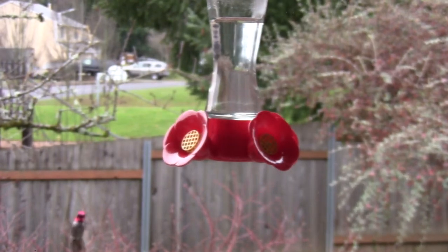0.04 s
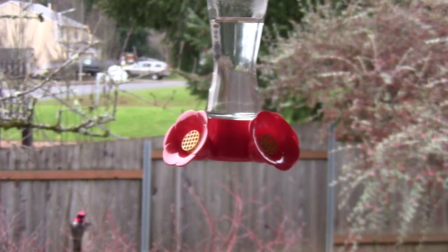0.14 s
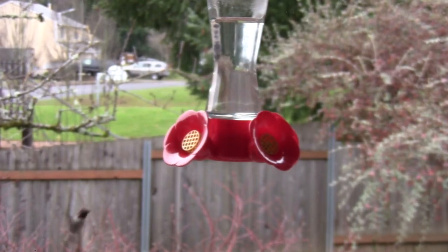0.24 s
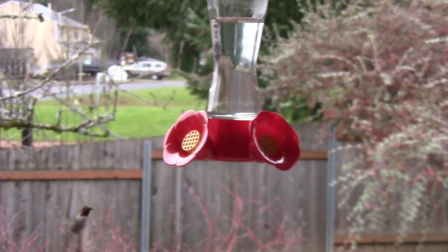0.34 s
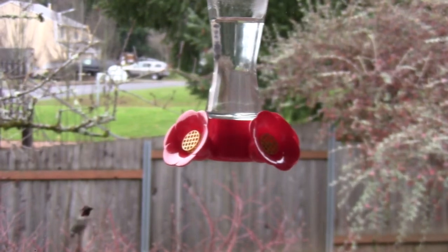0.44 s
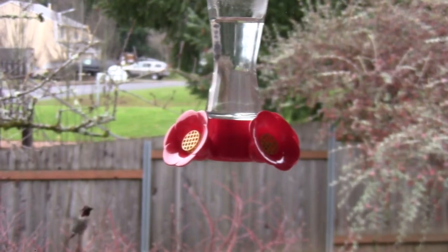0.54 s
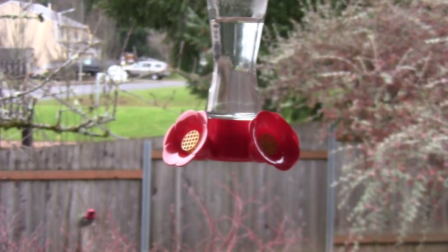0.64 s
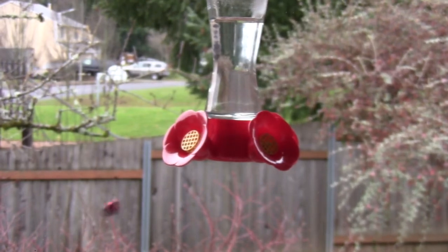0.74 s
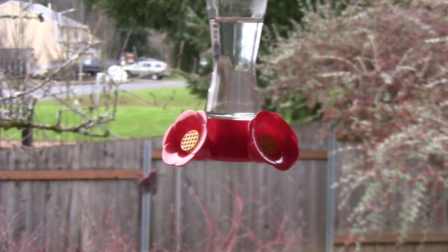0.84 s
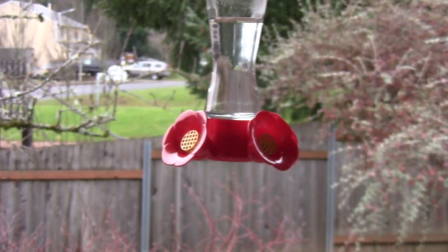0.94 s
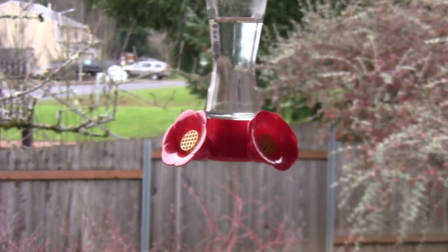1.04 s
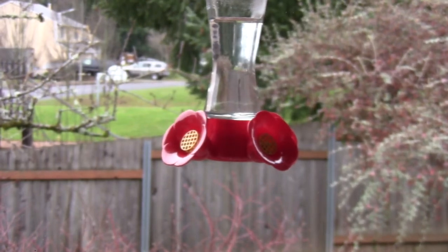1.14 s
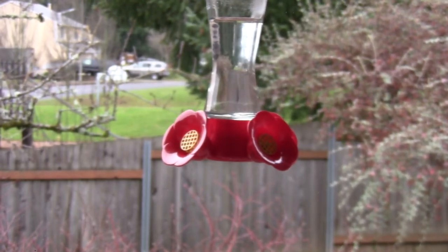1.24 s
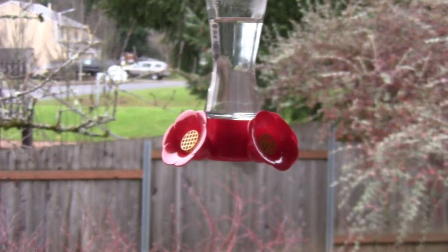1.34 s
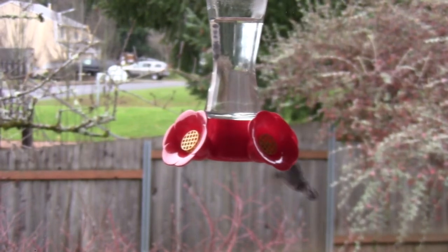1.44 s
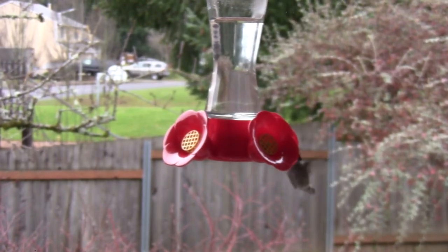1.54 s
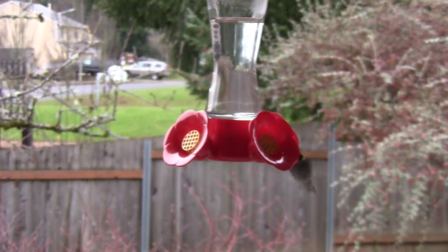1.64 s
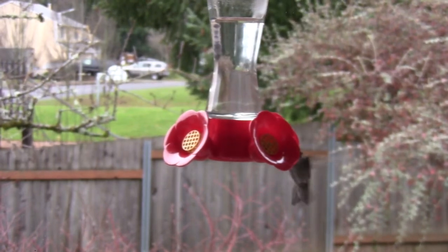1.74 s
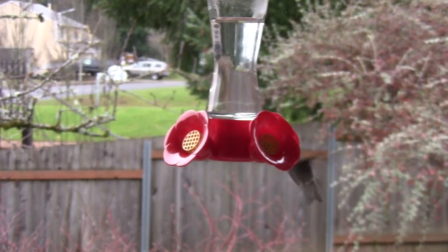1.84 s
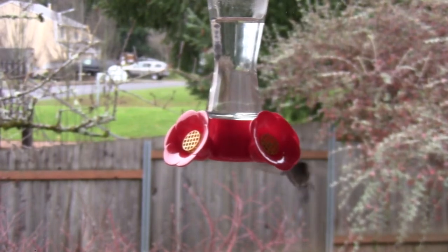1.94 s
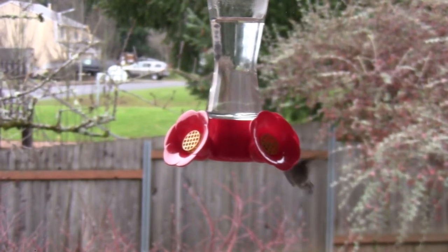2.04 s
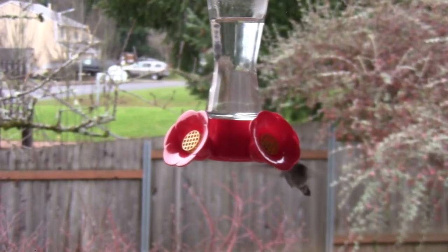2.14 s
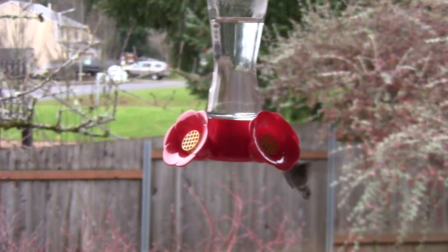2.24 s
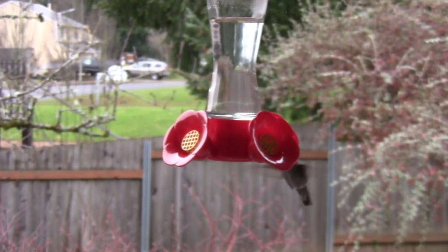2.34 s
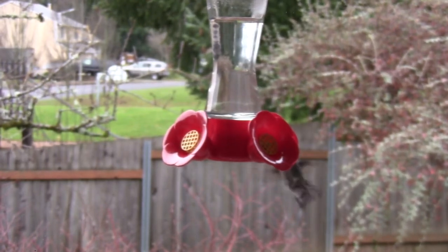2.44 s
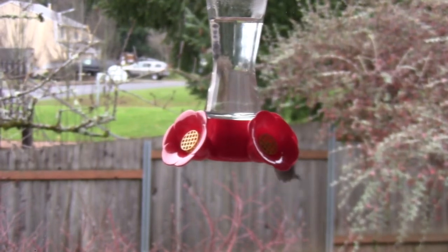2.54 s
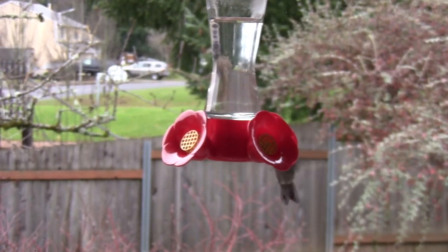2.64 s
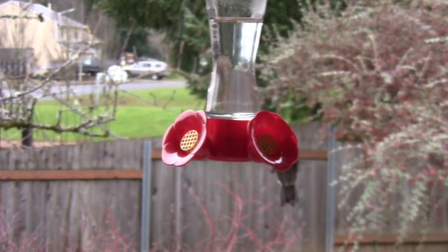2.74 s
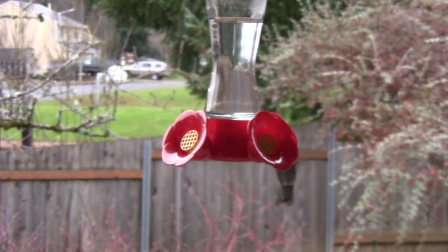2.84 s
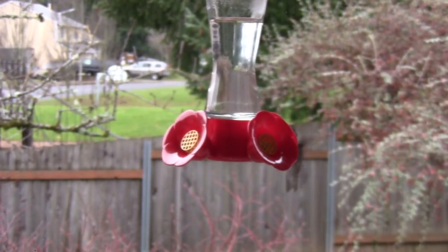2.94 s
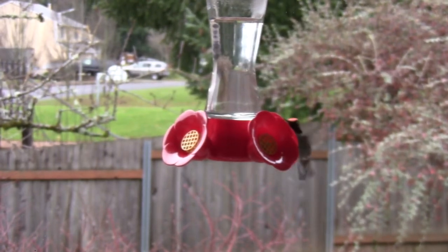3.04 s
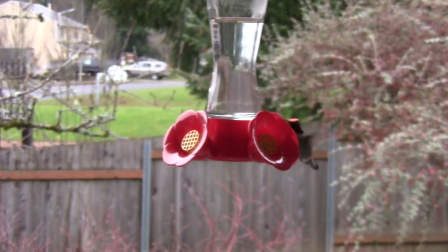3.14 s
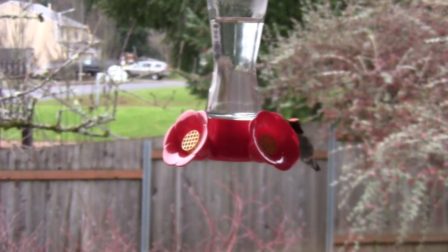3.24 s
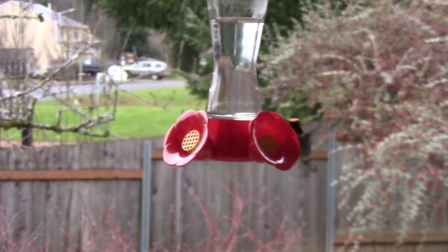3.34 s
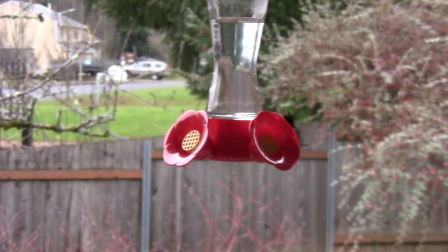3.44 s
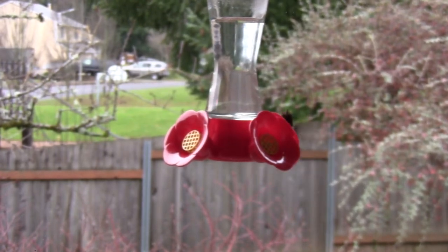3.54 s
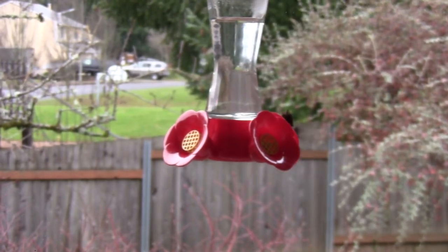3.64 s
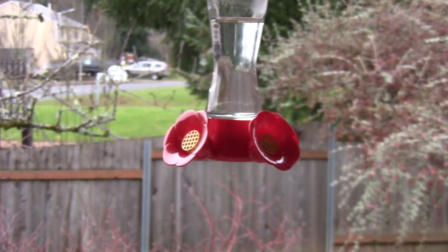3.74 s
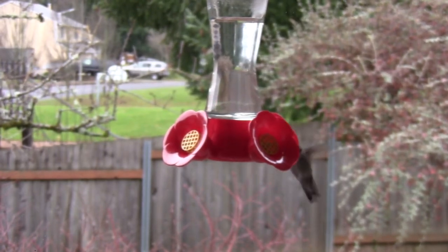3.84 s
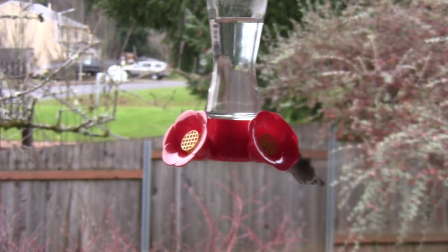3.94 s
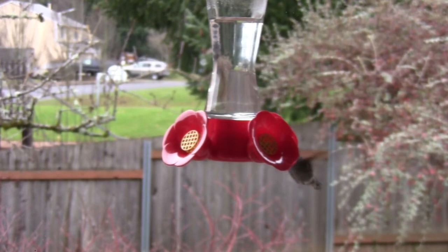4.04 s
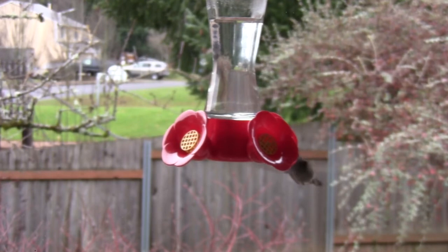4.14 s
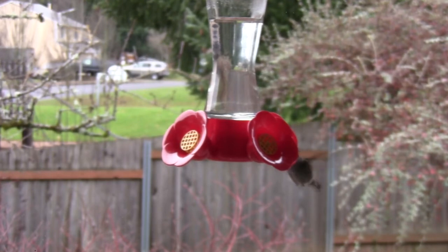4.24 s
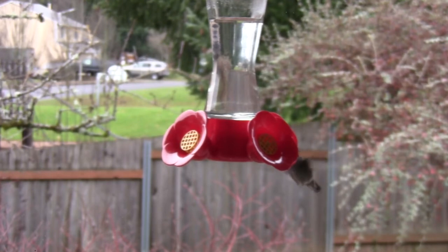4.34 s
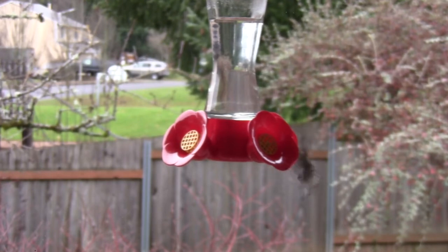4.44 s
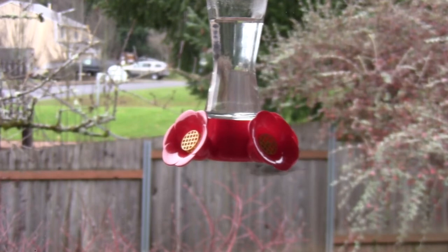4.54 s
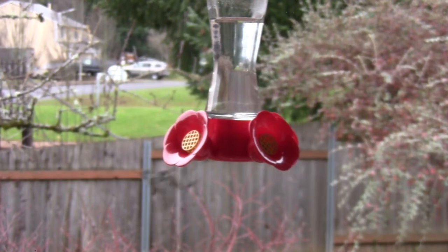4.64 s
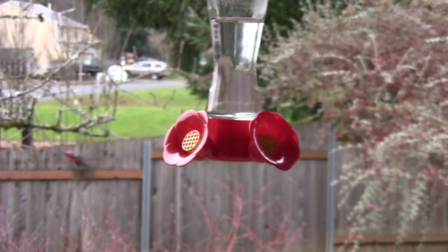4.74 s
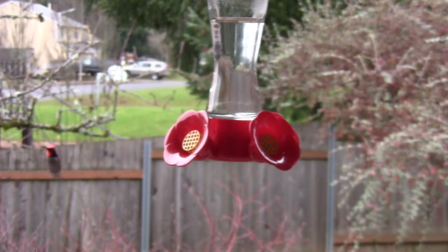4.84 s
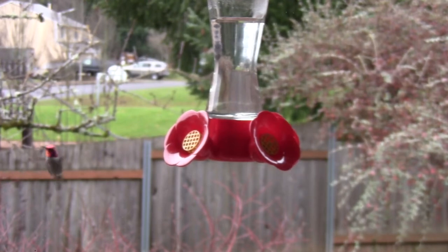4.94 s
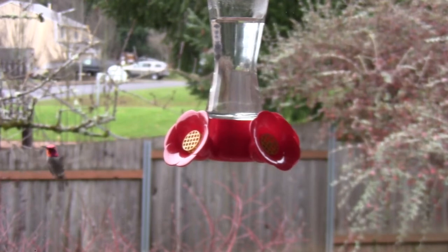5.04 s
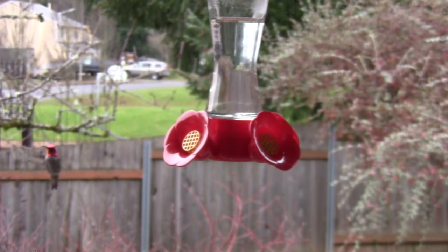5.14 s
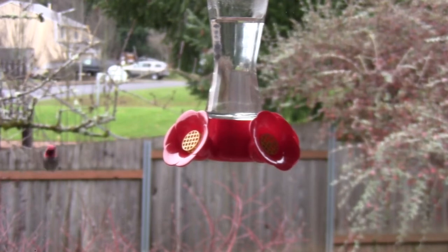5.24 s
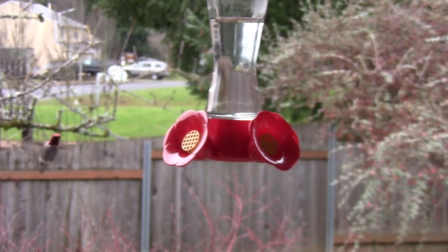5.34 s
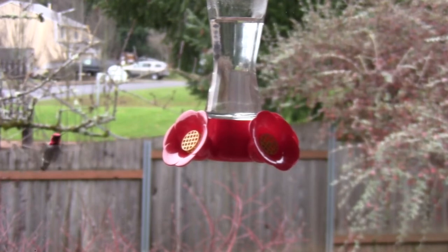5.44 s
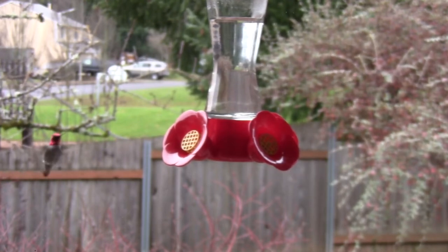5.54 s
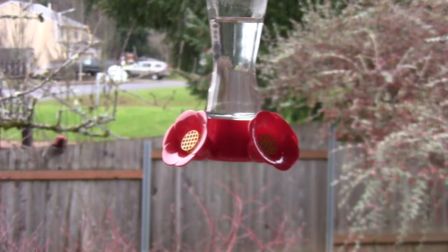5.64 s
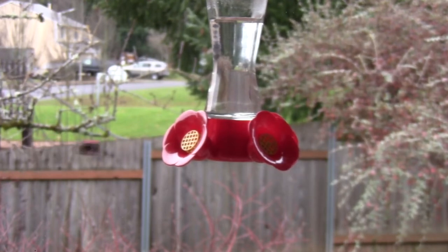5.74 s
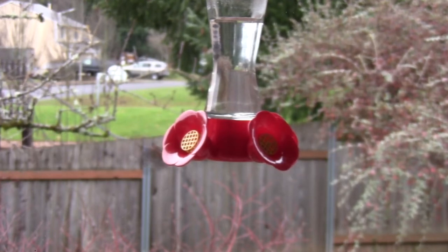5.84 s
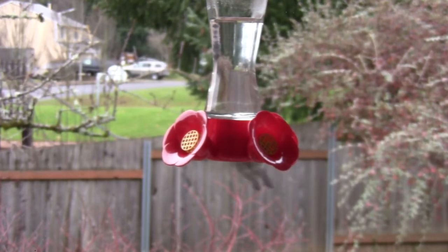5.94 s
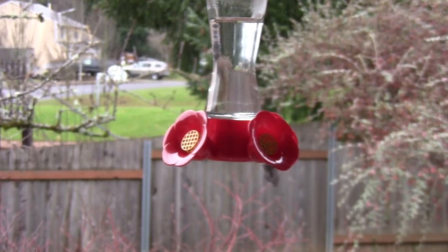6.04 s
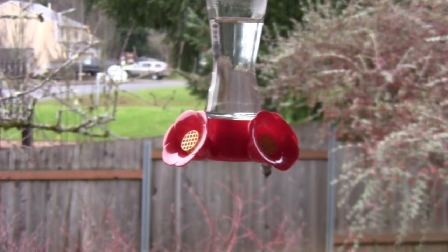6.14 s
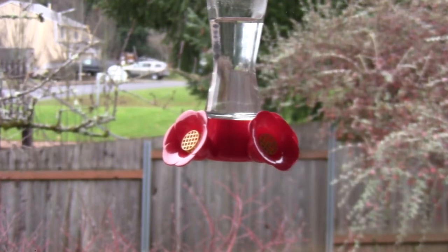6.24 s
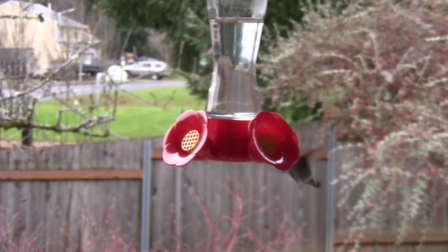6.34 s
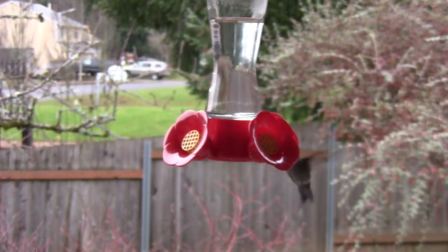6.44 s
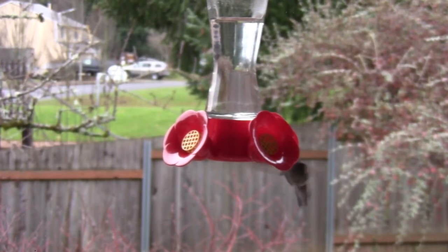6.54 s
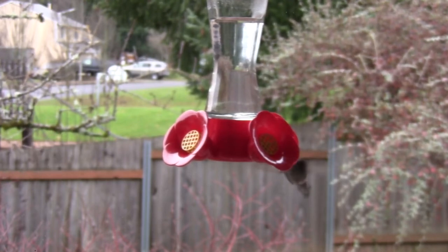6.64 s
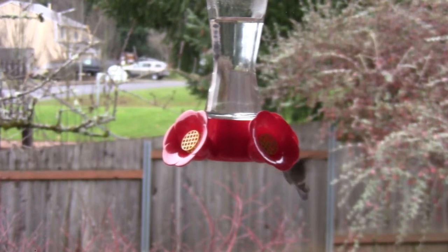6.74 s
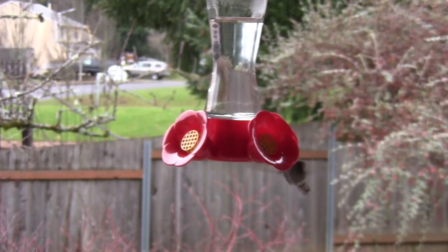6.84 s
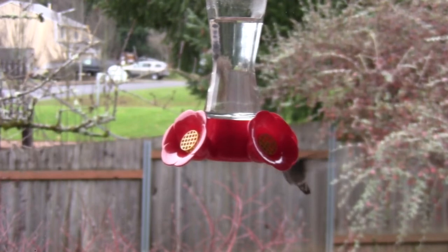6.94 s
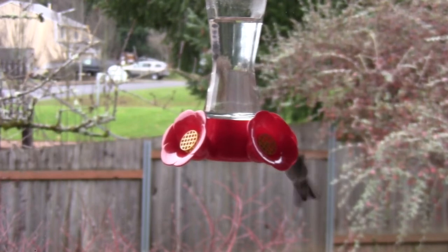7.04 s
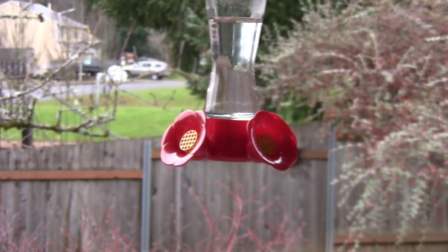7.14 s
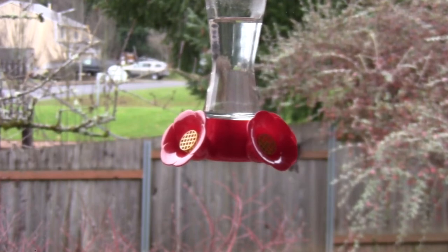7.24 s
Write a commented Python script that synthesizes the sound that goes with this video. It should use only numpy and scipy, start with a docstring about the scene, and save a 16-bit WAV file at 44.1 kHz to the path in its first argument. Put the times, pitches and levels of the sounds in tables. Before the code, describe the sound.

In a quiet backyard, distant traffic rumble, soft hiss and a low wavering drone continue throughout, the drone sinking slightly. At first a hummingbird's wing hum is faint and distant, with a brief swell near 1 second and a tiny sharp chip at 1.3. At about 1.45 the hum bursts in close, a deep throbbing buzz near fifty beats a second with fluttering air and feather hiss, climbing in pitch to a quick spurt around 2.5. From 2.6 to 3.8 it is lower, softer and uneven. Faint bird calls pass near 3.3; a brighter chip snaps at 3.84. The strong higher hum returns from 3.9 to 4.65, with thin high calls near 4.6, then drops far off. A chip sounds at 5.8. Moderate hum returns at 6, another chip at 6.3, then loud steady hovering until 7.15, easing away with a last chip at 7.2.

```python
"""A hummingbird hums close to a stereo microphone at a garden feeder and now and then gives a sharp chip.
It darts in and away, beats faster to hold still and slower to back off. The hum is a stack of overtones of
the wingbeat, the air and feather noise is pulsed in time with it, and the chips are fast falling sweeps.
Behind it: thin calls of other birds, far traffic, a low wavering drone and the hiss of a quiet yard."""
import sys
import numpy as np
from scipy import signal
from scipy.fft import rfft, irfft
from scipy.io import wavfile
from scipy.ndimage import uniform_filter1d

SR = 44100
rng = np.random.default_rng(int(sys.argv[2]) if len(sys.argv) > 2 else 0)


def file_out(sig):
    """Save sig as 16-bit WAV at sys.argv[1]."""
    # one column per channel
    cols = np.atleast_2d(sig).T
    # limit, then scale
    lim = np.clip(cols, -1, 1)
    pcm = np.round(lim * 32767).astype(np.int16)
    wavfile.write(sys.argv[1], SR, pcm)


N = 321930
TIME = np.arange(N) / SR
EDGE_HZ = 15950  # top of the recorder's band

# the flight, one list a stretch, in at the feeder or far off from the microphone:
# start_s [s], wingbeat_hz [Hz], hum_db [dB], stirred_air_db [dB]
FLIGHT_STRETCHES = [
    [(0, 49.8, -41, -68.5), (.2, 46.8, -41, -75.5), (.33, 48.96, -37, -71.5), (.65, 48.5, -47, -71),
     (.8, 49.8, -35, -63.5), (.92, 52.05, -44, -71.5), (.96, 52.8, -28, -58.5), (1.0, 50, -37, -54.5),
     (1.06, 47.2, -40.5, -69), (1.29, 48.25, -37, -65), (1.42, 49.66, -42, -65)],
    [(1.46, 49.68, -23.5, -56), (1.514, 52, -22.5, -48.5), (1.55, 51.4, -26.5, -51), (1.61, 48.3, -24, -56),
     (1.75, 48.5, -23.5, -59), (1.8, 51.38, -22, -61), (1.876, 54.97, -20, -56), (2.06, 53.9, -19.5, -57.5),
     (2.14, 55.6, -20, -57), (2.4, 54.13, -20, -55.5), (2.45, 57.86, -18.5, -55.5),
     (2.49, 62.16, -19.5, -53.5), (2.532, 57.67, -23.5, -52), (2.55, 55.13, -27, -56)],
    [(2.6, 50.44, -24.5, -53.5), (2.65, 47.57, -33, -60), (2.73, 47.03, -24.5, -60),
     (2.88, 45.55, -26, -59.5), (2.99, 49.57, -22.5, -54), (3.07, 44.32, -37, -68.5),
     (3.11, 46.34, -29.5, -59), (3.15, 46.8, -29.5, -60), (3.34, 45, -27, -59.5), (3.47, 46.2, -26, -57),
     (3.536, 43.86, -30.5, -62), (3.6, 44.96, -28, -61.5), (3.76, 45.5, -28.5, -60), (3.83, 44.8, -36, -63)],
    [(3.89, 52, -22.5, -56), (3.94, 54.75, -19.5, -52.5), (4.02, 56.7, -22, -57), (4.1, 53.9, -19.5, -58.5),
     (4.2, 55.05, -20, -55), (4.38, 55.4, -19.5, -57), (4.47, 59.5, -18, -57), (4.53, 55.95, -22, -55.5),
     (4.61, 52, -20.5, -54), (4.67, 48.3, -28, -59), (4.72, 50.5, -41, -66), (4.77, 54.2, -31, -57),
     (4.83, 54.5, -30, -56), (4.92, 51.87, -37, -67)],
    [(5.0, 54, -35, -74), (5.2, 53, -44, -72.5), (5.35, 48.85, -42, -68.5), (5.6, 47.72, -39, -68.5),
     (5.7, 47.84, -39, -67), (5.82, 51.8, -47, -62), (5.924, 51.13, -40.5, -70)],
    [(5.98, 49.9, -26, -52.5), (6.02, 51.1, -27, -53), (6.075, 52.5, -26, -53), (6.18, 47.87, -28.5, -60.5),
     (6.26, 48.4, -29.5, -57.5), (6.308, 51.8, -32, -63.5), (6.36, 54.4, -18, -53), (6.44, 56, -21, -57.5),
     (6.61, 55, -20.5, -58.5), (6.71, 53.6, -20.5, -59), (6.8, 53.9, -21, -58.5), (7.0, 54.4, -20.5, -59),
     (7.11, 60, -19, -56), (7.16, 58.25, -20.5, -53), (7.21, 52.2, -31, -58), (7.25, 52.2, -27.5, -53.5),
     (7.3, 53, -30.5, -67)],
]
CALM_AIR_DB = -33.5  # stirred air under the hum in still hovering; more is rough flight
HISS_DB, HISS_HUM_SHARE = -3, 0.31  # feather hiss over a blend of hum and stirred air


def wings():
    """Hum, torn air, feather hiss and downwash all follow the course of one flight."""
    beat_hz, hum_db, stir_db = columns(sum(FLIGHT_STRETCHES, []))
    turns = np.cumsum(beat_hz * (1 + 0.0065 * drift(0.026))) / SR
    rough_db = stir_db - hum_db - CALM_AIR_DB
    hiss_db = stir_db + HISS_DB - HISS_HUM_SHARE * rough_db
    hum = wing_hum(turns, beat_hz, hum_db, stir_db, rough_db)
    return hum + wing_air(turns, stir_db, hiss_db) + downwash(hiss_db)


# the lowest overtones against the hum:
# multiple, slow_beat_db [dB], fast_beat_db [dB], share of the roughness followed [0-1]
LOWEST_OVERTONES = [(1, 1.5, -0.1, 0.07), (2, -1, -0.3, 0.06), (3, -6.5, -7, .01), (4, -10.5, -15, .9)]
# the same four when far off, the third thins most, the fourth gains a little: level_db [dB]
FAR_CHANGE_DB = [-2, -2.5, -3.5, 0.5]
# higher overtones, riding on the stirred air: multiple, slow_beat_db [dB], fast_beat_db [dB]
HIGH_OVERTONES = [(5, 0.5, -6.5), (6, 1, -8), (7, -8, -13), (8, -8.5, -4), (9, -11.5, -6), (10, -10, -15),
                  (11, -14, -14.5), (12, -23, -30), (13, -18, -32), (14, -33, -23)]
HIGH_OVER_AIR_DB = 15.5
# how higher overtones answer rough flight: multiple, gain [dB per dB of roughness]
ROUGHNESS_GAIN = [(5, .7), (6, .3), (7, 1.1), (8, .7), (9, 1.1), (10, 1.3), (11, 1.1), (14, .6)]
# even overtones gain on odd ones when the up stroke pushes as hard as the down stroke:
# start_s [s], even_over_odd_db [dB]
EVEN_OVER_ODD = [(0, -2), (1.4, -1.5), (1.46, -7.5), (1.55, 8), (1.63, -2), (1.79, -2), (1.84, 3),
                 (1.88, -0.5), (2.46, -1.5), (2.54, 5.5), (2.6, -8), (2.75, -1), (2.88, -1), (3.0, -1.5),
                 (3.48, 3), (3.58, -2), (3.76, 0.5), (3.79, -12), (3.84, -14), (3.89, -3), (3.94, 5.5),
                 (4.02, 0), (4.46, 0.5), (4.53, 8), (4.6, -3), (4.68, 6), (4.8, 1), (5.9, -2.5), (5.97, -4),
                 (6.09, 7), (6.18, -5), (6.3, -8), (6.42, 4), (6.6, -2), (6.89, 3), (7.1, -1), (7.2, 6.5),
                 (7.25, -7)]
HIGH_EVENS_SHARE = 0.44  # how far overtones above the second follow it
# each wing radiates unevenly, so the lean differs by overtone: multiple, left_over_right_db [dB]
WING_LEAN = [(1, 3), (2, -1.5), (3, 1.5), (4, 4), (6, 2.5), (8, 0.5)]
# hum levels between which the lean to the right passes from its far value to its near one
FAR_DB, NEAR_DB = -32, -30
PAN_FAR_DB, PAN_SLOW_DB, PAN_FAST_DB = -4.2, -5.5, -3.5  # left over right, before the wing lean
SWAY_DB, SWAY_S = .3, .06  # each low overtone swells a little on its own as the body sways
SPURT_HZ, SPURT_FOURTH_DB_PER_HZ = 57, -2.5  # above this beat rate the fourth overtone falls away


def wing_hum(turns, beat_hz, hum_db, stir_db, rough_db):
    """Each stroke is one sharp pressure dip, built from overtones of the wingbeat."""
    fast = np.clip((beat_hz - 48.5) / 5, 0, 1)
    near = np.clip((hum_db - FAR_DB) / (NEAR_DB - FAR_DB), 0, 1)
    near_pan_db = PAN_SLOW_DB + fast * (PAN_FAST_DB - PAN_SLOW_DB)
    pan_db = PAN_FAR_DB + near * (near_pan_db - PAN_FAR_DB)
    evens_db, = columns(EVEN_OVER_ODD)

    levels = []
    for k, slow_db, fast_db, share in LOWEST_OVERTONES:
        db = hum_db + slow_db + fast * (fast_db - slow_db) + share * rough_db
        db = db + SWAY_DB * drift(SWAY_S) + (1 - near) * FAR_CHANGE_DB[k - 1]
        if k == 4:
            db = db + SPURT_FOURTH_DB_PER_HZ * np.maximum(beat_hz - SPURT_HZ, 0)
        levels.append((k, db))
    high_db = stir_db + HIGH_OVER_AIR_DB - rough_db
    for k, slow_db, fast_db in HIGH_OVERTONES:
        db = high_db + slow_db + fast * (fast_db - slow_db) + read(ROUGHNESS_GAIN, k) * rough_db
        levels.append((k, db))

    hum = np.zeros((2, N))
    for k, db in levels:
        db = db + evens_db / 2 * (-1) ** k * (1 if k <= 2 else HIGH_EVENS_SHARE)
        skew = 2.6 - 0.44 * (k == 1)  # radians: all overtones meet in a slightly lopsided dip
        unsteady_db = 0.9 * np.sqrt(k) * drift(0.023)
        # radians, wandering as the bird bobs
        left_late = np.array([[-1], [1]]) * (.04 * k + .07 * drift(.12))
        tone = np.sqrt(2) * np.cos(2 * np.pi * k * turns + skew + left_late)
        hum += amp(db + unsteady_db) * sides(pan_db + read(WING_LEAN, k)) * tone
    return hum


# colour of the air torn by the wings: pitch_hz [Hz], level_db [relative dB per Hz]
STIRRED_AIR = [(200, 12.5), (450, 1.5), (800, 0), (1500, -8), (3000, -12.5), (5000, -20), (7500, -23.5),
               (11000, -43)]
# colour of the feather hiss: pitch_hz [Hz], level_db [relative dB per Hz]
FEATHER_HISS = [(3000, -43), (6000, -10), (9000, -4), (11000, -1.5), (13500, -3), (15800, -5)]


def wing_air(turns, stir_db, hiss_db):
    """Air tears at both turns of the wing; the feathers hiss chiefly on the down stroke."""
    down, up = amp(2.5 * drift(.012)), amp(2.5 * drift(.012))  # no two strokes alike
    torn = evened(.45 + .55 * down * puff(turns, .68, .045) + .6 * up * puff(turns, .14, .05))
    swish = evened(.56 + .88 * down * puff(turns, .74, .1) + .36 * up * puff(turns, .12, .066))
    stirred = band_evened(noise(STIRRED_AIR, 0.21, 0.00021, 1.95), lo=1560, hi=3640) * torn
    hiss = band_evened(noise(FEATHER_HISS, 0.072, 0.000187, 1.1), lo=9760, hi=14500) * swish
    return stirred * amp(stir_db) * sides(-3.15) + hiss * amp(hiss_db) * sides(-1.1)


def puff(turns, at, dies):
    """A burst once a beat that swells quickly at a point of the stroke and dies away."""
    u = ((turns - at) % 1) / dies
    return u * np.exp(1 - u)


# colour of the draught on the microphone: pitch_hz [Hz], level_db [relative dB per Hz]
DOWNWASH_COLOUR = [(12, -5), (28, -24), (70, -7), (150, -6.5), (300, -35), (500, -66)]


def downwash(hiss_db):
    """The air pushed by the wings buffets the microphone as low noise."""
    draught = evened(noise(DOWNWASH_COLOUR, 0.97, 0, 1.0))
    return draught * amp(hiss_db + 21) * sides(-1.5)


# the bird's chips: start_s [s], level_db [dB before the throat], start_hz [Hz], end_hz [Hz], length_s [s],
# fade_db [dB over the sweep], overtones_db [dB at its start], echo_db [dB],
# left_over_right_db [dB], left_late_s [s]
CHIP_CALLS = [(1.3232, -26, 6900, 1300, .0078, 2, -15, -11, 0, .00002),
              (3.8432, -16.5, 7800, 1300, .007, -7, -12, -11, -3, .00012),
              (5.7717, -23.5, 7900, 1300, .0078, -1, -13, -9, 0, -.000116),
              (6.3258, -18, 8400, 1400, .0098, 0, -13, -9, -5, .00011),
              (7.2274, -15, 7000, 2300, .006, -11, -9, -7, -2, .00007)]
# resonance of the throat: pitch_hz [Hz], level_db [dB]
THROAT_COLOUR = [(1200, -7), (1750, -2), (2400, -5), (3200, -1), (5300, -8), (7300, -5), (9000, -8),
                 (15000, -9)]


def chips():
    """A very fast falling sweep that swells and turns harsh, thrown back by near surfaces."""
    out, lead_s = np.zeros((2, N)), .0005  # lead_s: room for the earlier side
    for (s, db, start_hz, end_hz, length, fade_db,
         overtones_db, echo_db, pan_db, late_s) in CHIP_CALLS:
        t = TIME[:800] - lead_s - np.array([[late_s / 2], [-late_s / 2]])
        u = np.clip(t / length, 0, 1)
        hz = start_hz + (end_hz - start_hz) * (.3 * u + .7 * u * u * (3 - 2 * u))
        turn = 2 * np.pi * np.cumsum(hz * (t > 0), axis=1) / SR
        swell = np.minimum(u / .15, 1) * np.minimum((1 - u) / .2, 1)

        pure = amp(read(THROAT_COLOUR, hz)) * np.sin(turn)
        harsh = 0
        for k in range(2, 8):
            gain = amp(read(THROAT_COLOUR, k * hz) - (k - 1.5))
            harsh = harsh + gain * np.sin(k * turn) * (k * hz < EDGE_HZ)
        call = amp(db + fade_db * u) * swell * (pure + amp(overtones_db + 10.9 * u) * harsh)

        echoes = garden(near_t60=0.028, far_t60=0.18, far_db=-17.0)
        heard = amp(echo_db) * signal.fftconvolve(call, echoes, axes=1)
        heard[:, :800] += call * sides(pan_db)
        part = out[:, round((s - lead_s) * SR):][:, :heard.shape[1]]
        part += heard[:, :part.shape[1]]
    return out


# first reflections close to the microphone: delay_s [s], level_db [dB before the echo colour]
NEAR_SURFACES = [(.0035, -11), (.006, -13)]
# colour of all the echoes: pitch_hz [Hz], level_db [dB]
GARDEN_COLOUR = [(1000, 17), (2000, 4), (3400, 3.5), (5000, 9), (7200, 4.5), (9000, 7.5), (15000, 0)]


def garden(near_t60, far_t60, far_db):
    """Sparse echoes of random sign that die away: feeder, fence and shrubs."""
    size = SR // 2
    t = TIME[:size]
    taps = rng.choice([-1., 1.], (2, size)) * (rng.random((2, size)) < .15)
    taps *= (amp(-60 * t / near_t60) + amp(far_db - 60 * t / far_t60)) * (t > .002)
    taps /= np.linalg.norm(taps[0])
    for delay, db in NEAR_SURFACES:
        # each side lands up to 39 samples later
        taps[[0, 1], round(delay * SR) + rng.integers(0, 40, 2)] += amp(db)
    colour = amp(read(GARDEN_COLOUR, np.fft.rfftfreq(size, 1 / SR)))
    return irfft(rfft(taps) * colour, size)


# thin calls of other birds, far from the microphone: start_s [s], length_s [s],
# start_hz [Hz], end_hz [Hz], level_db [dB], roughness [0-1]
FAR_CALLS = [(0.789, 0.016, 6900, 7300, -61, .8), (0.827, 0.041, 7200, 7190, -63, .6),
             (3.293, 0.037, 1500, 1556, -47, 0.53), (3.348, 0.026, 2070, 2200, -45, 0.61),
             (3.36, 0.029, 2770, 3000, -45.5, .6), (3.365, 0.031, 1690, 1710, -44, 0.5),
             (4.617, 0.0424, 6113, 6557, -48, 0.7), (4.633, 0.035, 6840, 6970, -46.5, 0.6),
             (4.655, 0.09, 6850, 7050, -59, 0.8)]


def whistles():
    """Short gliding tones, nearly all rising, blurred by distance."""
    out, blur = np.zeros(N), drift(0.0017)
    for s, length, start_hz, end_hz, db, rough in FAR_CALLS:
        u = np.clip((TIME - s) / length, 0, 1)
        turn = 2 * np.pi * np.cumsum(start_hz + (end_hz - start_hz) * np.sqrt(u)) / SR
        out += amp(db) * np.sin(np.pi * u) * np.sin(turn) * (1 - rough + rough * blur)
    return out


def yard():
    """The far background: a wash of traffic and hiss, with a drone in the middle."""
    return yard_wash() + far_drone()


# colour of traffic and hiss: pitch_hz [Hz], level_db [relative dB per Hz]
YARD_COLOUR = [(12, -20), (20, -10.5), (53, 3.5), (113, -7.5), (240, -22), (386, -17), (637, -23),
               (797, -19.5), (1020, -27), (1250, -28), (1430, -32.5), (2500, -41.5), (4760, -52),
               (11300, -51.5), (15800, -53)]
# how alike the wash is on both sides: pitch_hz [Hz], likeness [-1 to 1]
YARD_LIKENESS = [(60, 1), (180, 0.95), (550, 0.44), (1650, -0.33), (4970, -0.0043), (15000, -0.18)]
YARD_DB = -33.5


def yard_wash():
    """Far traffic rumble thinning to hiss, as noise whose level drifts a little."""
    likeness = read(YARD_LIKENESS, np.fft.rfftfreq(1024, 1 / SR))
    wash = noise(YARD_COLOUR, likeness, 0, 1.4)
    wash = wash / np.sqrt(np.mean(wash.mean(0) ** 2))
    return amp(YARD_DB + 0.36 * drift(0.57)) * wash * sides(-0.2)


# the drone, perhaps a far motor: start_s [s], reference pitch_hz [Hz], level_db [dB]
DRONE_COURSE = [(0, 120.5, -42), (.6, 120.5, -39.5), (1.0, 120.7, -38), (1.8, 119.9, -36.5),
                (3.1, 117.7, -42.5), (4.75, 114.4, -36), (5.2, 114.8, -35.5), (5.6, 114.8, -36.5),
                (5.7, 113.8, -39.5), (7.3, 114.1, -35)]
# its lines: multiple of the reference pitch, level_db [dB against the course]
DRONE_OVERTONES = [(0.99, 0), (4 / 3, -32), (5 / 3, -19), (2, -19), (7 / 3, -20)]


def far_drone():
    """A few lines on one slowly moving pitch, each wavering in level on its own."""
    hz, level_db = columns(DRONE_COURSE)
    turn = 2 * np.pi * np.cumsum(hz) / SR
    drone = np.zeros(N)
    for k, db in DRONE_OVERTONES:
        drone += np.sqrt(2) * amp(level_db + db + 2.6 * drift(0.076)) * np.sin(k * turn)
    return drone


def noise(spectrum, same, left_late_s, patchy_db):
    """Stereo noise from random short-time spectra with drifting patches."""
    frames, hz = N // 256 + 5, np.fft.rfftfreq(1024, 1 / SR)
    a, b, c, d, patches = rng.standard_normal((frames, 513, 5)).T
    patches = uniform_filter1d(uniform_filter1d(patches, size=10, axis=0), size=10, axis=1)
    patches = evened(patches)
    same = np.clip(same * np.ones(513), -1, 1)[:, None]
    left = a + 1j * b
    right = same * left + np.sqrt(1 - same ** 2) * (c + 1j * d)
    delay = np.exp(-2j * np.pi * hz * left_late_s)[:, None]
    z = np.array([left * delay, right])
    z *= amp(read(spectrum, hz)[:, None] + patchy_db * patches)
    return signal.istft(z, nperseg=1024, noverlap=768)[1][:, :N]


def drift(seconds):
    """Smoothed chance of rms 1; a longer span wanders more slowly."""
    span = round(seconds * SR)
    return evened(uniform_filter1d(uniform_filter1d(rng.standard_normal(N), span), span))


def evened(x):
    """Scales to an rms of 1."""
    return x / np.sqrt(np.mean(x ** 2) + 1e-20)


def band_evened(x, lo, hi):
    """Scales so that the mid signal within one band has an rms of 1."""
    sos = signal.butter(N=4, Wn=[lo, hi], btype="band", fs=SR, output="sos")
    band = signal.sosfilt(sos, x.mean(0))
    return x / np.sqrt(np.mean(band ** 2))


def amp(db):
    """Decibels to gain."""
    return 10 ** (np.asarray(db) / 20)


def sides(db):
    """Left and right gains for a left-over-right difference in dB."""
    return amp(np.array([db / 2 * np.ones(1), -db / 2 * np.ones(1)]))


def read(points, at):
    """Reads a table along a logarithmic axis."""
    key, value = np.transpose(points)
    return np.interp(np.log(at + 1), np.log(key + 1), value)


def columns(rows):
    """The columns of a curve over time, one value a sample."""
    s, *values = np.transpose(rows)
    return [np.interp(TIME, s, v) for v in values]


def scene():
    """All sources at the microphone pair."""
    return wings() + chips() + whistles() + yard()


def record(dry):
    """The band limit of the recorder, a steep low-pass."""
    low_pass = signal.firwin(511, EDGE_HZ, window=("kaiser", 9), fs=SR)
    return signal.oaconvolve(dry, low_pass[None], "same")


dry = scene()
out = record(dry)
file_out(out)
```